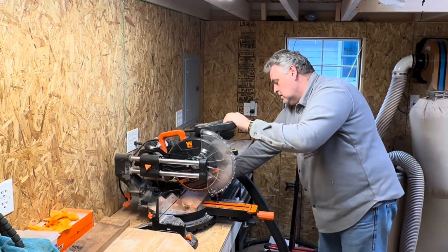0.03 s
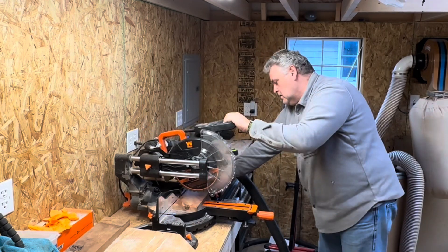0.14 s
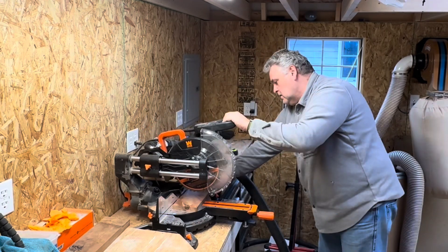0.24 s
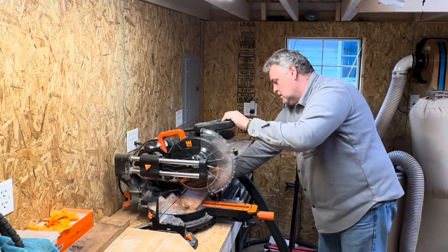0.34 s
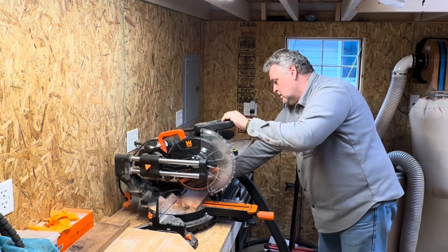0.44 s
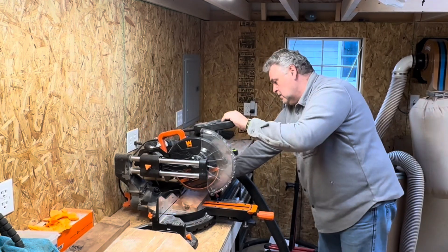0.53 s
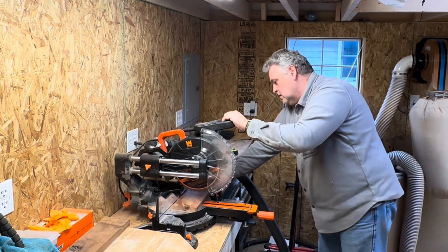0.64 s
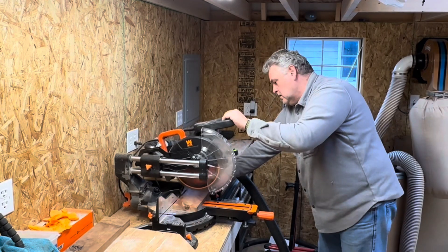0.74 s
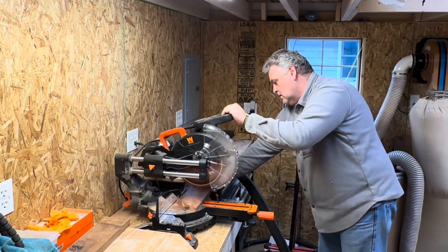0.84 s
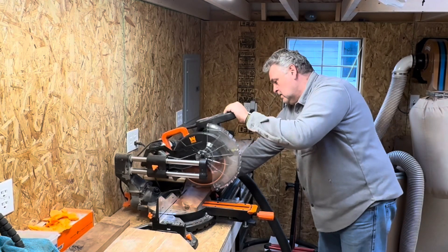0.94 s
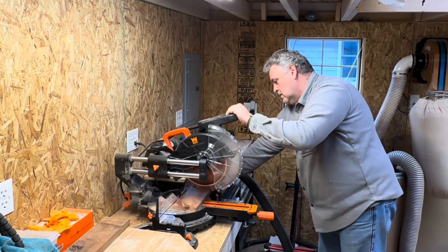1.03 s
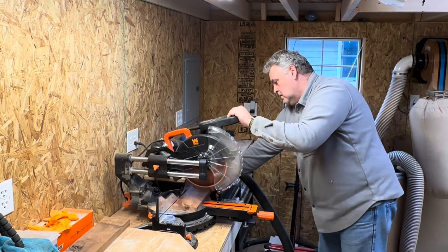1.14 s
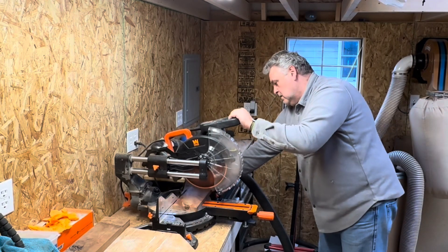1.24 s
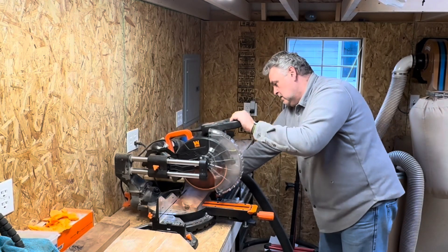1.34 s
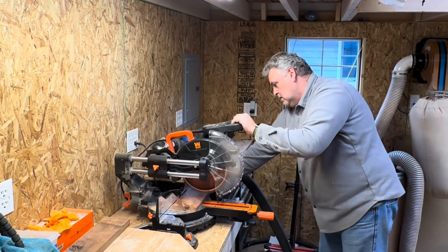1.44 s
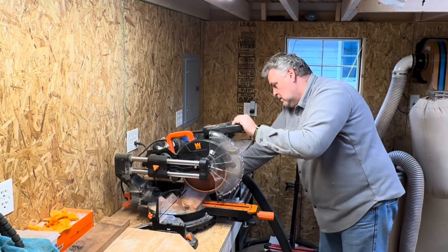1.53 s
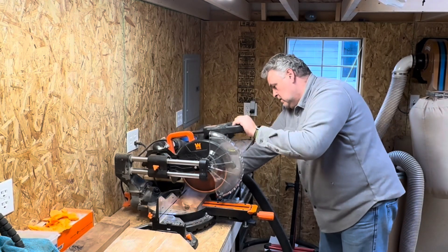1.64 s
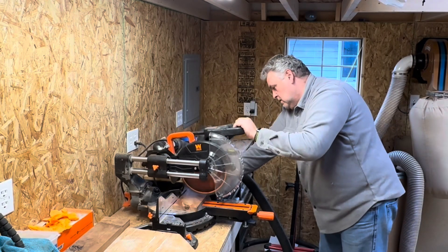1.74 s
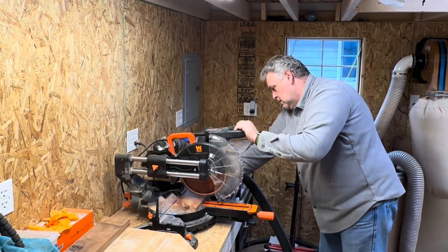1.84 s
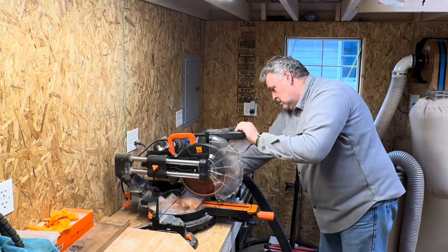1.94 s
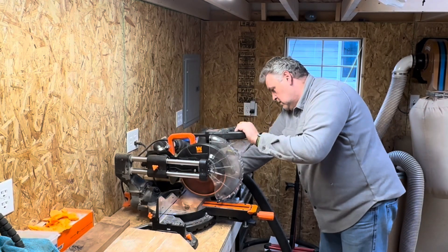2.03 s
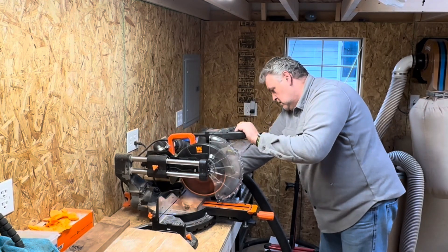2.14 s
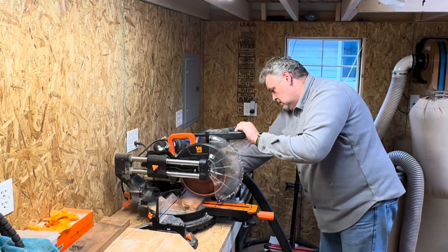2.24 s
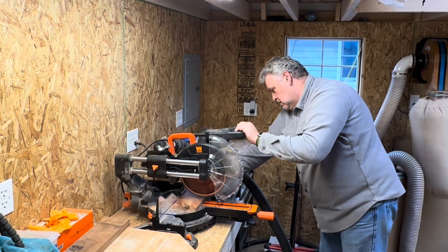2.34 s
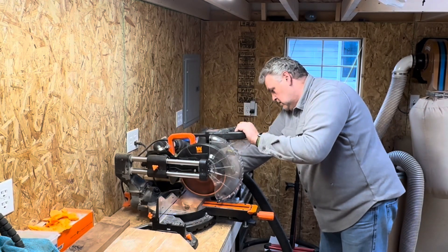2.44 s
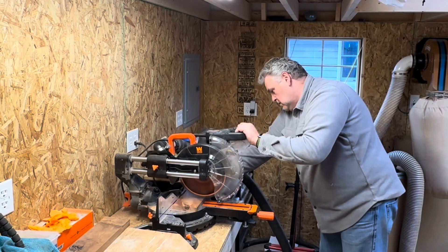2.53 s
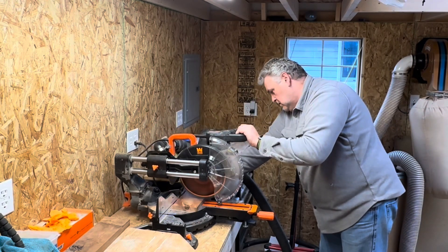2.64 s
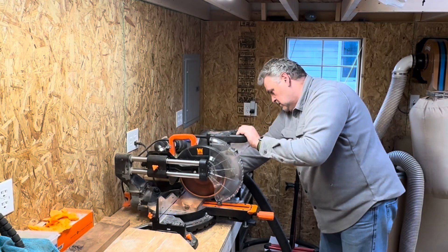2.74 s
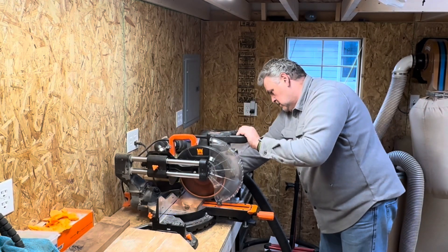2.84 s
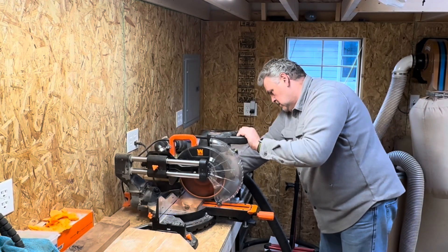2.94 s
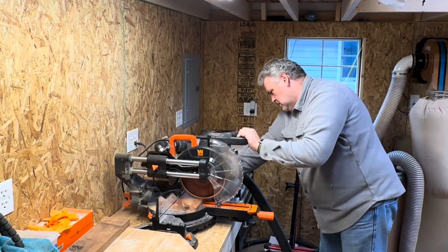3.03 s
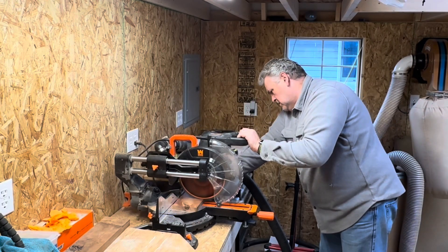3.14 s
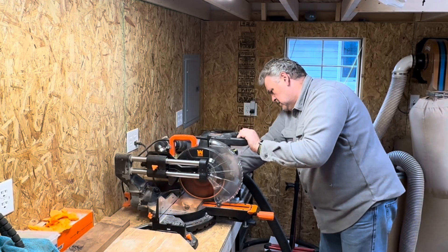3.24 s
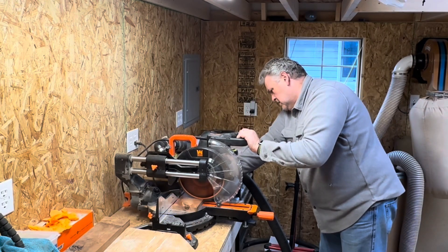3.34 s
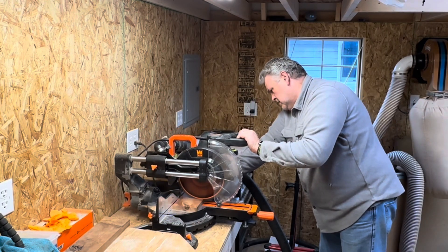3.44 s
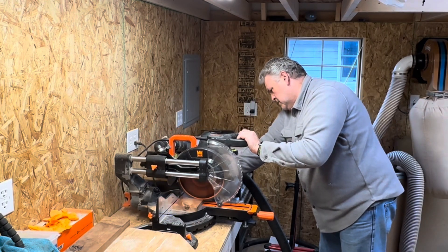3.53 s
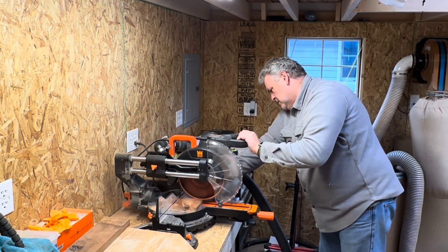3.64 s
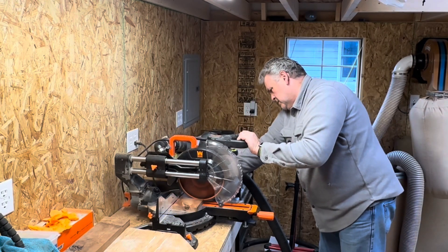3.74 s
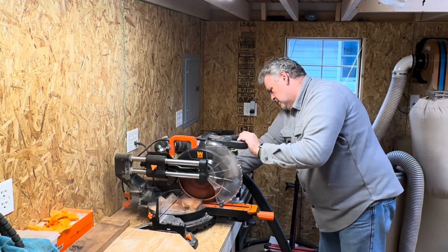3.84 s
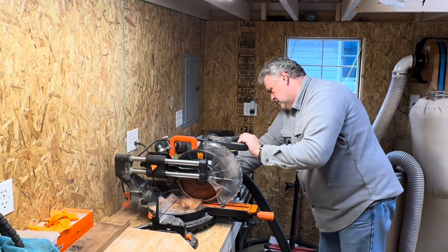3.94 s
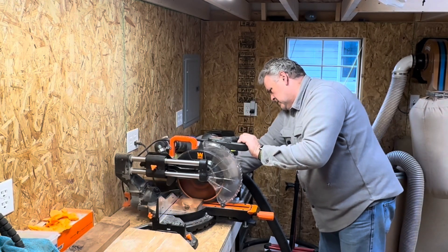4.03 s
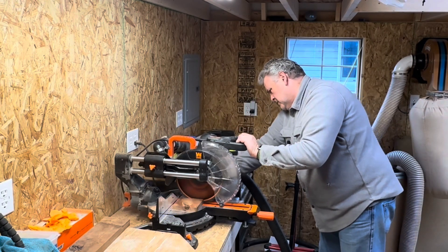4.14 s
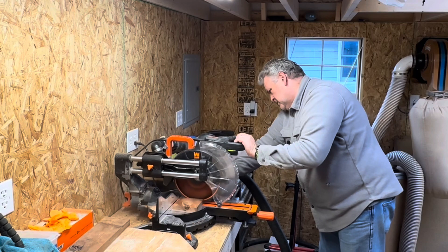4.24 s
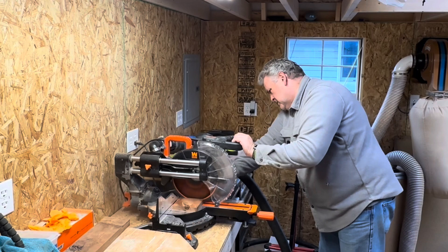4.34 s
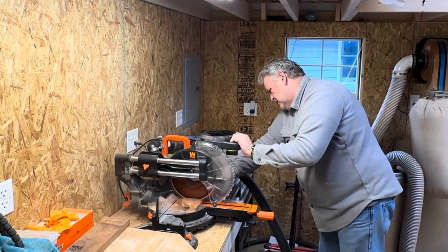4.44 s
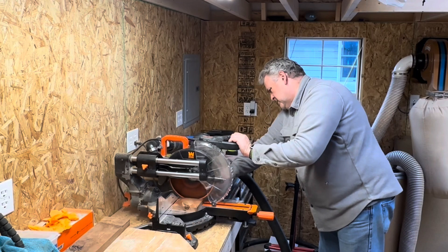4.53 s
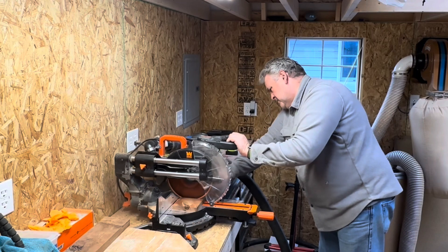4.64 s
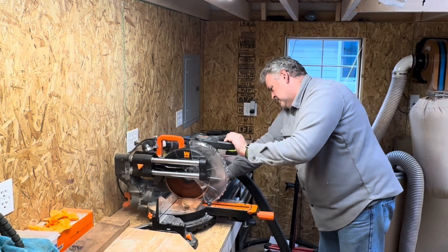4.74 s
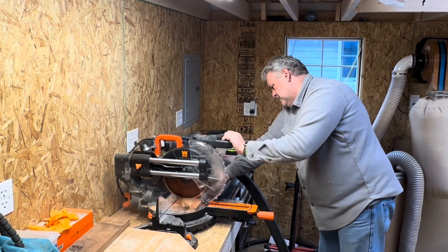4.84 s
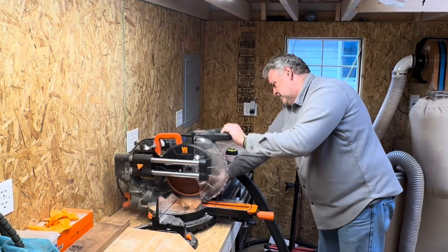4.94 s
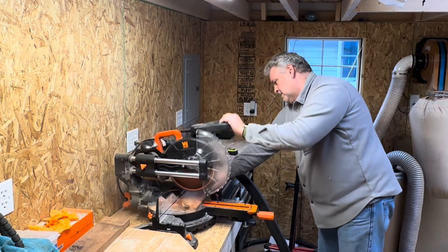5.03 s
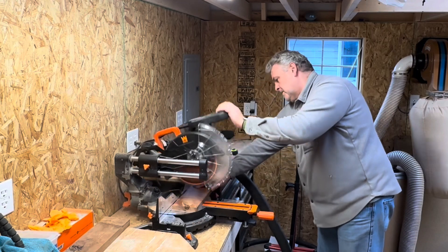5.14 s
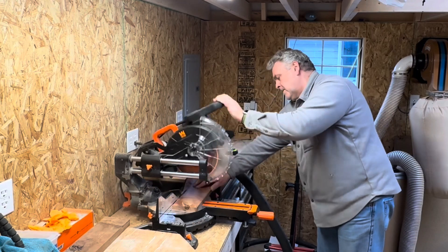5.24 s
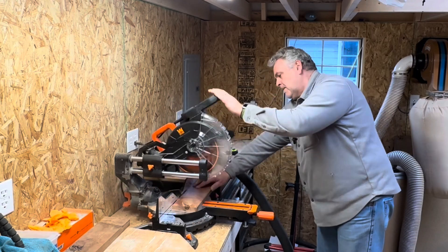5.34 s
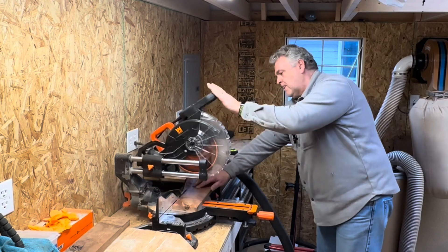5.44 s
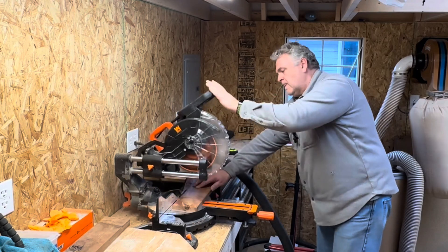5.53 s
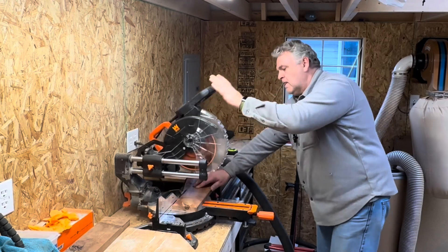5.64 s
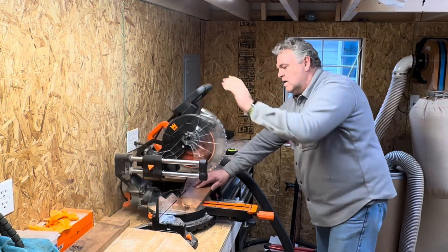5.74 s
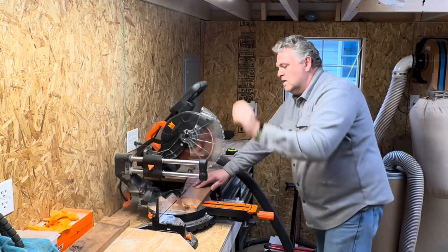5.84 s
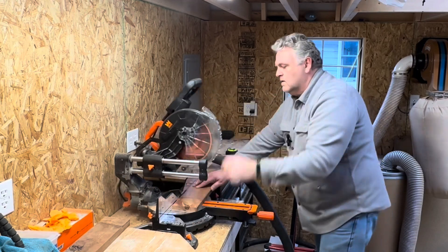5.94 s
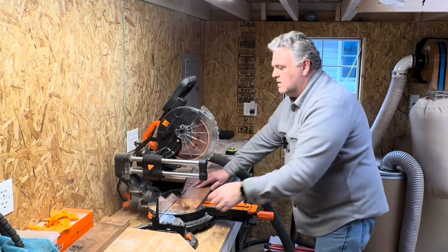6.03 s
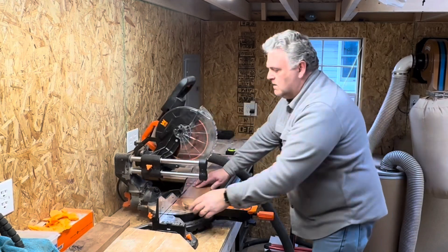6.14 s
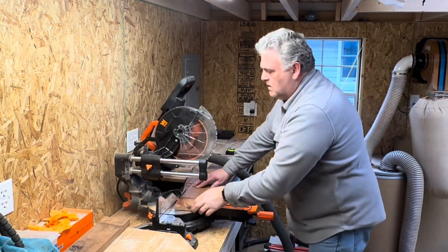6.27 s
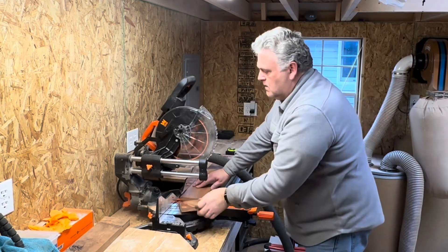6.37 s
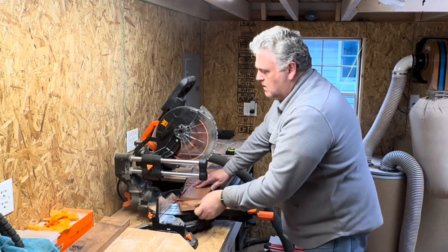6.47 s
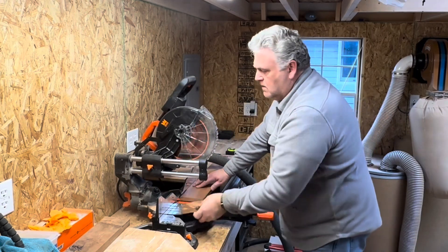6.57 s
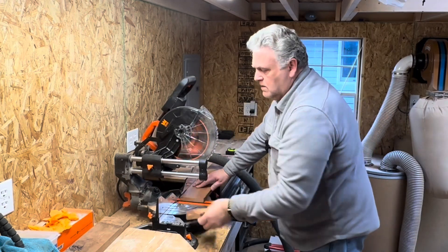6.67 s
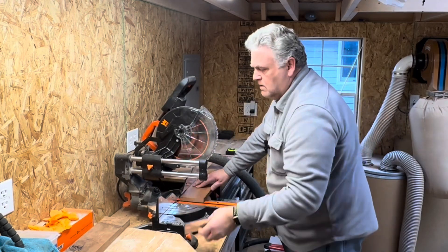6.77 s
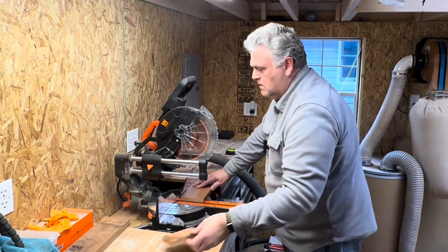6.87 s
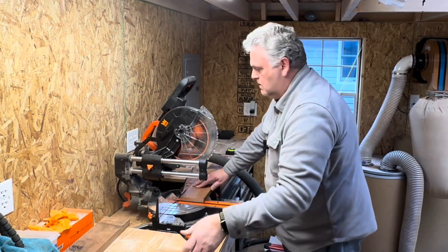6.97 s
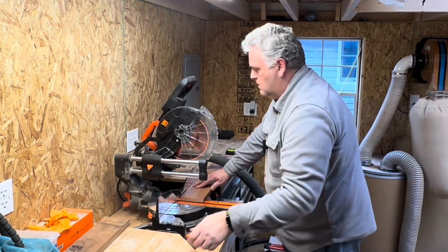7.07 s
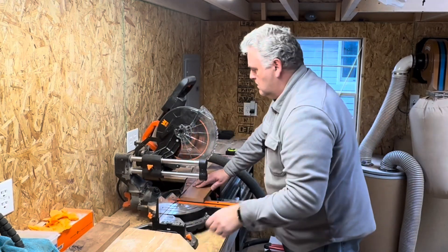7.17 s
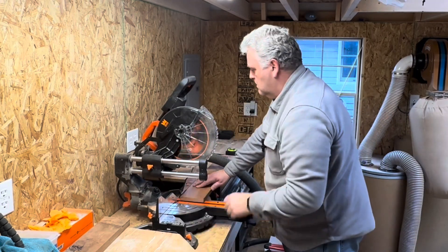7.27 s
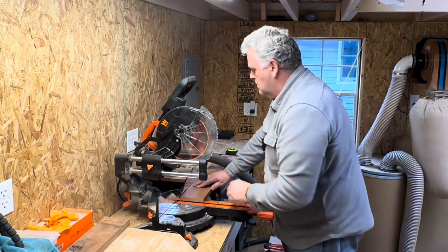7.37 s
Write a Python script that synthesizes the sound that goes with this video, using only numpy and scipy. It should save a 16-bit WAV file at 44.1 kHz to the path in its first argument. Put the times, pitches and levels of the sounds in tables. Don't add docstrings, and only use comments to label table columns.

```python
import sys
import numpy as np
from scipy import signal
from scipy.fft import rfft, irfft
from scipy.io import wavfile
from scipy.ndimage import uniform_filter1d

SR = 44100
rng = np.random.default_rng(int(sys.argv[2]) if len(sys.argv) > 2 else 0)


def file_out(sig):
    cols = np.atleast_2d(sig).T
    lim = np.clip(cols, -1, 1)
    pcm = np.round(lim * 32767).astype(np.int16)
    wavfile.write(sys.argv[1], SR, pcm)


def gain_from_db(level_db):
    decades = np.asarray(level_db, float) / 20
    return 10 ** decades


N = 326428
T = np.arange(N) / SR
HZ = np.fft.rfftfreq(1024, 1 / SR)
FRAME_T = (np.arange(N // 256 + 5) * 256) / SR
BRAKE_S, COAST_S, CRAWL_S = 4.95, 5.32, 5.62
# from and to, in seconds.
SINKING = (2.2, 2.8)
# time in seconds, turns in Hz.
ARMATURE = [(.76, 135.8), (.85, 199.4), (.95, 248.7), (1.1, 294.2), (1.3, 325.3), (1.5, 344.5),
            (1.9, 367.5), (2.62, 385.5), (3.04, 372.6), (3.7, 361), (4.4, 348), (4.9, 359.5), (4.97, 345),
            (5.13, 256), (5.3, 187), (5.5, 127.1), (5.72, 96.4), (6.2, 56)]
# time in seconds, whine in dB, roar in dB, dullness of the roar in dB.
WORK = [(.7, -10, -43, 7), (.78, -9.5, -28, 0), (.92, -9, -20, 1), (1.25, -8.5, -14, -4.5),
        (1.94, -11, -13, -6.5), (2.38, -14.5, -15.5, -19), (2.6, -18.5, -21.5, -18.5),
        (2.86, -27.5, -30, -12), (3.46, -34.5, -34.5, -6), (3.62, -47, -34.5, -6),
        (4.83, -53, -30.5, -13.5), (5.0, -35, -36, -5), (5.12, -19.5, -39.5, 4), (5.27, -23, -43.5, 5.5),
        (5.5, -26, -48, 5), (5.72, -33, -55.5, 7), (6.1, -50, -54, -0.5), (6.3, -38, -67, 23)]


def evened(x):
    return x / np.sqrt(np.mean(x ** 2) + 1e-20)


def read(points):
    f, value = np.transpose(points)
    return np.interp(np.log(HZ + 1), np.log(f + 1), value)


def columns(rows, t):
    s, *values = np.transpose(rows)
    return [np.interp(t, s, v) for v in values]


def stretch(start, end, ramp, outside_db, inside_db):
    corners = [start - ramp, start + ramp, end - ramp, end + ramp]
    return np.interp(T, corners, [outside_db, inside_db, inside_db, outside_db])


def humps(modes, lift_db):
    power = 1
    for hz, width, db in modes:
        power = power + gain_from_db(2 * (db + lift_db)) / (1 + (2 * (HZ - hz) / width) ** 2)
    return np.sqrt(power)


def resonate(x, hz, width):
    turn = np.exp(2j * np.pi * np.cumsum(hz * np.ones(len(x))) / SR)
    r = np.exp(-np.pi * width / SR)
    return 2 * (turn * signal.lfilter([1 - r], [1, -r], x / turn)).real


def drift(span):
    size = round(span * SR)
    return evened(uniform_filter1d(uniform_filter1d(rng.standard_normal(N), size), size))


def noise(gain, patchy_db):
    a, b, patches = rng.standard_normal((len(FRAME_T), len(HZ), 3)).T
    patches = uniform_filter1d(uniform_filter1d(patches, size=6, axis=0), size=12, axis=1)
    grains = a + 1j * b
    unit = np.sqrt(np.mean(signal.istft(grains[:, :200], nperseg=1024, noverlap=768)[1] ** 2))
    shaped = grains * gain * gain_from_db(patchy_db * evened(patches))
    return signal.istft(shaped, nperseg=1024, noverlap=768)[1][:N] / unit


def band_unit(gain, lo_hz, hi_hz):
    inside = (HZ > lo_hz) & (HZ < hi_hz)
    return gain / np.sqrt((gain[inside] ** 2).sum(0) / len(HZ))


def bursts(rows):
    out = np.zeros(N)
    for s, length, hz, width, db in rows:
        shake = rng.standard_normal(round(length * SR) + 4000)
        sing = evened(resonate(resonate(shake, hz, width), hz, width)[4000:])
        out[round(s * SR):][:len(sing)] += gain_from_db(db) * sing * signal.windows.tukey(len(sing), .5)
    return out


def room(x, wet_db, t60):
    tail = rng.standard_normal(12000) * gain_from_db(-60 * T[:12000] / t60)
    return x + gain_from_db(wet_db) * signal.fftconvolve(x, tail / np.linalg.norm(tail))[:N]


def extractor():
    # time in seconds, blade tone in dB, hose whistle in Hz.
    fan = [(0, -50.5, 3220), (.27, -52, 2980), (.4, -52, 3200), (.47, -50, 3300), (.68, -53.5, 3100),
           (5.4, -56, 3500), (5.5, -50.5, 3040), (5.906, -30.5, 3190), (6.634, -26, 3185),
           (7.132, -29, 3070), (7.16, -25, 3220), (7.22, -32, 2920), (7.3, -34.5, 2920), (7.4, -36, 2920)]
    # frequency in Hz, level in dB per Hz.
    air_colour = [(15, -77), (25, -49), (140, -33), (297, -18.5), (331, -6.5), (359, -28), (410, -11),
                  (666, -15.5), (826, -13.5), (896, -15), (1020, -19.5), (2300, -32.5), (3260, -37),
                  (4270, -37), (15500, -50)]
    # frequency in Hz, width in Hz, level in dB.
    duct = [(195, 17, 11.5), (280, 8.9, 12.5), (603, 14, 0.5), (842.5, 16, 11), (1070.7, 8.2, 15),
            (1200, 38, -2), (4070, 30, 8), (4930, 60, 8)]
    quiet_db = -52
    tone_db, whistle_hz = columns(fan, T)
    turns = np.cumsum(356.4 + 1.52 * drift(0.029)) / SR
    tone = np.zeros(N)
    for k, db in zip([1, 2, 3], [3, -27, -24]):
        tone += gain_from_db(tone_db + db + 0.69 * drift(0.015)) * np.sin(2 * np.pi * k * turns)

    swell_db = np.interp(FRAME_T, T, tone_db) - quiet_db
    rush_db = -46 + 0.15 * swell_db
    bright_db = -1 - 0.39 * swell_db
    shape = band_unit(gain_from_db(read(air_colour)) * humps(duct, 0), 400, 1300)
    treble = np.interp(HZ, [3300, 4000, 7500, 9000], [0.044, 1.0, 0.42, 0.041])
    rush = noise(shape[:, None] * gain_from_db(rush_db + 0.96 + np.outer(treble, bright_db + 12)), 2.2)

    whistle_db = -57 + .3 * (tone_db - quiet_db) - .034 * (whistle_hz - 3150)
    breath = resonate(rng.standard_normal(N), whistle_hz, 450)
    whistle = evened(resonate(breath, whistle_hz, 450))
    return tone + rush + gain_from_db(whistle_db + 2.5 + 2 * drift(0.06)) * whistle


def microphone():
    mains_hz, mains_db, hiss_db = 60, -67, -60
    hiss = signal.lfilter(*signal.butter(2, 13000, "high", fs=SR), rng.standard_normal(N))
    return gain_from_db(mains_db) * np.sin(2 * np.pi * mains_hz * T) + gain_from_db(hiss_db) * evened(hiss)


def gusts():
    # start in seconds, length in seconds, frequency in Hz, width in Hz, level in dB.
    caught = [(.16, .13, 1530, 60, -57), (0, .42, 4250, 250, -59), (0, .42, 3350, 250, -58),
              (.15, .18, 2930, 80, -51), (.24, .16, 3030, 250, -52), (.42, .13, 480, 25, -48),
              (5.85, .2, 1070, 25, -46), (5.85, 1.15, 275, 14, -47), (6.14, .14, 850, 20, -46),
              (6.0, .16, 3300, 300, -48)]
    return bursts(caught)


def roar():
    # frequency in Hz, level in dB per Hz.
    roar_colour = [(15, -51), (25, -21.5), (101, -16.5), (253, -25.5), (369, -48.5), (445, -10),
                   (567, -18.5), (872, -12), (1020, -15.5), (1950, -4.5), (3350, -2.5), (4270, 1.5),
                   (9820, -6), (13900, -1.5), (15500, -5)]
    # frequency in Hz, width in Hz, level in dB.
    free_modes = [(444.4, 28, 1.5), (900, 20, -4.5), (1270, 160, -1.5), (2190, 370, 7), (2596, 33, 11),
                  (2920, 150, 6.5), (3840, 1130, 3.5), (6200, 570, -4.5), (8130, 830, -4.5),
                  (13740, 980, -11)]
    # frequency in Hz, width in Hz, level in dB.
    held_modes = [(493, 660, 13.5), (1944, 16, 8.5), (2450, 41, 6), (2920, 17, -22.5), (4247, 11, 11),
                  (4740, 27, 8), (5370, 24, -41), (6020, 24, 9.5), (6600, 71, -12), (6730, 660, 3.5),
                  (8430, 470, 2.5)]
    bands = [(9300, 15500), (550, 1300), (2750, 3600), (4900, 6100)]
    _, level_db, dull_db = columns(WORK, FRAME_T)
    sunk = np.interp(FRAME_T, SINKING, [0, 1])

    bite_s = 2.64
    bite_times = [SINKING[0] - .2, SINKING[0], bite_s - .02, bite_s + .03, SINKING[1] + .1]
    bite_db = np.interp(FRAME_T, bite_times, [0, 4, 4, -5, 0])
    tilts_db = [0, dull_db, 0.36 + 0.64 * dull_db, 1.3 + 0.56 * dull_db + bite_db]

    modes = np.outer(humps(free_modes, 13.3), 1 - sunk) + np.outer(humps(held_modes, 2.0), sunk)
    shape = gain_from_db(read(roar_colour))[:, None] * modes
    own_db = [20 * np.log10(shape[9] / band_unit(shape, *band)[9]) for band in bands]
    want_db = np.array([level_db + tilt - own for tilt, own in zip(tilts_db, own_db)])

    knots_hz = np.log([200, 850, 2200, 3100, 5500, 11000])
    throat_db = 2.2 * (1 - sunk)
    lift_db = []
    for (hiss, body, rasp, fizz), throat in zip(want_db.T, throat_db):
        knots_db = [0.5 * hiss + 0.53 * body, body, min(rasp, fizz + 4) + throat, rasp - throat, fizz, hiss]
        lift_db.append(np.interp(np.log(HZ + 1), knots_hz, knots_db))

    fade = np.interp(FRAME_T, [WORK[-1][0] - .2, WORK[-1][0] + 0.64], [1, 0])
    start = np.interp(T, [.678, .693, .7], [0, .14, 1])
    return start * noise(shape * gain_from_db(np.transpose(lift_db) - 1.5) * fade, 2.06)


def trigger():
    # start in seconds, length in seconds, frequency in Hz, width in Hz, level in dB.
    clicks = [
        (.6815, .004, 14400, 1800, -29),
        (.684, .014, 14400, 1800, -43),
    ]
    return bursts(clicks)


def jolt():
    # start in seconds, length in seconds, frequency in Hz, width in Hz, level in dB.
    shakes = [(.684, .012, 810, 200, -35), (.695, .014, 810, 15, -13), (.708, .021, 815, 15, -9),
              (.737, .032, 770, 20, -15), (.767, .012, 770, 20, -21), (.783, .01, 760, 20, -17),
              (.695, .06, 650, 600, -23), (.695, .05, 2200, 250, -30), (.778, .045, 2000, 200, -15),
              (.83, .12, 4350, 400, -14.5), (.75, .1, 125, 25, -36), (1.0, .1, 5750, 200, -22),
              (.86, .07, 7500, 150, -24)]
    return bursts(shakes)


def speed():
    s, hz = np.transpose(ARMATURE)
    return uniform_filter1d(np.exp(np.interp(T, s, np.log(hz) ** 3) ** (1 / 3)), size=2500)


def flutter():
    turns = np.cumsum(speed()) / SR
    tick = np.exp(1.2 * np.cos(2 * np.pi * turns + .2 * drift(.01)))
    depth = np.interp(T, [5.45, 5.6, 5.95, 6.15], [.15, .55, .62, .25])
    return 1 + depth * (evened(tick) - 1)


def casing(hz, modes):
    power = gain_from_db(2 * -38)
    for f, width, db in modes:
        power = power + gain_from_db(2 * db) / (1 + (2 * (hz - f) / width) ** 2) ** 2
    return 10 * np.log10(power)


def order_levels(hz):
    multiples = [2, 7, 12, 14, 19, 24]
    # level in dB running free, cutting, braking, coasting, crawling.
    strength = [(-17.5, -0.5, -8, -27, -40), (0, -33, -10.5, -25, -24), (-4, 3, 0, -29, -35),
                (-3, -13, 0.5, -3, -37), (-13, -18.5, 9, -28, -37), (-11.5, -4, -21, -31, 4.5)]
    # frequency in Hz, width in Hz, level in dB.
    driven_modes = [(441, 210, -1.5), (696, 57, -1), (1544, 120, -13), (1680, 335, 0), (2160, 215, -2),
                    (2920, 380, -5.5), (4070, 380, -12), (4340, 82, -8.5), (4437, 410, -1),
                    (5000, 1300, -1.5), (6400, 790, 4.5), (6820, 370, 7), (8100, 1100, 4), (8090, 360, -10)]
    # frequency in Hz, width in Hz, level in dB.
    braked_modes = [(560, 270, -0.5), (1770, 150, 4), (2140, 110, -10.5), (3225, 480, 0), (4290, 750, -9.5)]
    # multiple, level in dB against the roar.
    faint = [(3, -22), (6, -19), (21, -15)]
    # multiple, start in seconds, end in seconds.
    coasting = [(7, 4.93, 5.04), (7, 5.22, 5.35), (13, 5.1, 5.24), (21, 5.18, 5.3), (19, 5.3, 5.45),
                (45, 5.64, 5.87), (106, 5.5, 5.7), (114, 5.96, 6.15)]
    coasting_db = [-30, -36, -33, -35, -46, -49, -57, -59]
    # multiple, start in seconds, end in seconds.
    swells = [(7, 1.0, 1.12), (7, 1.13, 1.38), (7, 1.45, 2.25), (12, 1.62, 2.12), (12, 2.88, 3.38),
              (14, 1.05, 1.16), (14, 1.19, 2.65), (24, .95, 1.3), (24, 1.68, 1.86), (24, 1.9, 2.25),
              (19, 1.25, 2.2), (2, 2.2, 2.85), (3, 1.84, 2.02), (3, 2.2, 2.36), (3, 2.4, 2.8),
              (3, 2.85, 3.55), (6, 1.5, 2.0), (19, 5.0, 5.16), (14, 5.13, 5.58), (12, 5.19, 5.3),
              (24, 5.62, 5.8), (24, 5.98, 6.1), (12, 1.22, 1.5), (14, 5.44, 5.57), (12, 2.18, 2.55),
              (12, .7, .85), (14, .7, .85)]
    swells_db = [-3, 4.5, -5, -7, -4, 2, -7, -6, 4, -6, -5, -9, 5, 4, -9, 6, 4, -11, 1.5, -6, -6, -5, 3, 3,
                 3, -6, -6]
    whine_db, roar_db, _ = columns(WORK, T)
    states = [*SINKING]
    for s in (BRAKE_S, COAST_S, CRAWL_S):
        states += [s - .05, s + .05]

    lines = []
    slow_t, slow_hz = T[::64], hz[::64]
    for k, (free, cut, brake, coast, crawl) in zip(multiples, strength):
        state_db = np.interp(T, states, [free, cut, cut, brake, brake, coast, coast, crawl])
        driven, braked = casing(k * slow_hz, driven_modes), casing(k * slow_hz, braked_modes)
        casing_db = np.interp(T, slow_t, np.where(slow_t < BRAKE_S, driven, braked))
        lines.append([k, whine_db + state_db + casing_db])
    for k, db in faint:
        lines.append([k, roar_db + db])
    for (k, start, end), db in zip(coasting, coasting_db):
        lines.append([k, db + stretch(start, end, .05, -30, 0)])

    for (order, start, end), swell_db in zip(swells, swells_db):
        for line in lines:
            if line[0] == order:
                line[1] = line[1] + stretch(start, end, .03, 0, swell_db)
    return lines


def whine():
    rough = {2: 1.2, 7: .55, 12: .95, 13: 2, 14: 1.6, 19: 1.6, 21: 2, 24: .45, 45: 9, 106: 2, 114: 7}
    hz = speed()
    turns = np.cumsum(hz) / SR
    blade_turn = 0.21
    wobble = np.interp(T, [2.5, 2.7, 4.9, 5.0], [.2, .45, .6, .5]) * np.cos(2 * np.pi * blade_turn * turns)
    play = np.interp(T, [2.0, 2.3, 3.5, 4.95, 5.1, 5.25, 5.35], [.33, .22, .25, .33, .52, .52, .14])
    rattle = drift(.003) + 1j * drift(.003)
    sway, sway_db = drift(.03), np.where(T < COAST_S, 1.2, .8)
    tone, ticks = np.zeros(N), flutter()
    for place, (k, db) in enumerate(order_levels(hz)):
        lag = 9000 * place
        shaken = 1 + wobble + rough.get(k, 1.5) * play * np.roll(rattle, lag)
        level = gain_from_db(db + sway_db * np.roll(sway, lag))
        if k > 40:
            level = level * ticks
        tone += level * (shaken * np.exp(2j * np.pi * k * turns)).real
    turning = (T > ARMATURE[0][0]) * (T < ARMATURE[-1][0])
    return tone * uniform_filter1d(1. * turning, size=900)


def panels():
    # start in seconds, length in seconds, frequency in Hz, width in Hz, level in dB.
    drumming = [(1.14, .14, 120, 30, -38), (1.27, .24, 850, 50, -29), (1.53, .2, 470, 70, -32),
                (1.98, .22, 455, 60, -33), (2.04, .24, 1600, 300, -31), (1.2, .12, 1920, 50, -27)]
    return bursts(drumming)


def binds():
    # start in seconds, length in seconds, frequency in Hz, level in dB.
    pinches = [(2.2, 1.12, 2620, -33), (2.78, .12, 7400, -36), (2.8, .1, 5300, -34), (3.62, .17, 6800, -37),
               (3.97, .17, 480, -35), (3.97, .1, 5000, -36), (3.98, .07, 5500, -39), (3.98, .07, 5950, -40),
               (4.0, .12, 7000, -36), (4.17, .14, 2500, -36), (4.3, .3, 8450, -40), (4.38, .2, 6340, -36),
               (4.6, .1, 6720, -38), (4.82, .1, 6730, -30), (4.82, .1, 6360, -35), (4.84, .07, 5000, -38),
               (5.28, .26, 4480, -41), (5.44, .3, 6680, -49), (5.5, .22, 5750, -49)]
    return bursts([(s, length, hz, 55 + .018 * hz, db) for s, length, hz, db in pinches])


def guard():
    # start in seconds, length in seconds, frequency in Hz, width in Hz, level in dB.
    narrow_rings = [(2.81, .13, 4370, 20, -28), (3.35, .11, 4370, 60, -30), (5.56, .1, 4450, 300, -42),
                    (5.64, .14, 4600, 450, -43), (5.74, .28, 4700, 450, -50), (5.92, .26, 14300, 1200, -54),
                    (5.98, .19, 12300, 500, -58), (6.04, .13, 13800, 70, -59), (3.04, .34, 4365, 25, -36),
                    (4.2, .65, 2475, 30, -42), (4.38, .11, 5050, 40, -39)]
    return bursts(narrow_rings)


def board():
    # time in seconds, peak in dB, brightness in dB,
    # pitch in Hz favoured by the spot that lands.
    knocks = [(6.985, -24, -30, 950), (7.008, -5.5, -6.5, 1200), (7.015, -10.5, -3, 1310),
              (7.021, 3, -13, 1380), (7.028, -2, -12, 1250), (7.034, -3, -10.5, 1280),
              (7.041, -3.5, -11.5, 1050), (7.053, -20, -14, 1000), (7.062, -8, -19, 950),
              (7.076, -12, -28, 950), (7.088, -13, -35, 900), (7.128, -6, -32.5, 1270),
              (7.135, -6, -37, 1300), (7.144, -7.5, -42, 1300), (7.156, -11.5, -30, 1000)]
    # frequency in Hz, width in Hz, level in dB.
    wood_modes = [(70, 60, -24), (253, 76, -15.5), (436, 67, 7.5), (674, 91, -15), (810, 110, -0.5),
                  (1005, 88, 3), (1200, 104, 0), (1377, 110, -2), (1507, 130, -3.5), (1616, 110, -3.5),
                  (1857, 97, -8.5), (2040, 90, -21)]
    # frequency in Hz, width in Hz, level in dB.
    metal_modes = [(3000, 920, 15.5), (3300, 180, -5), (4586, 150, 9), (4400, 1800, 5), (6150, 2800, -9),
                   (9340, 880, -30)]
    out, t = np.zeros(N), T[:4000]
    for s, db, bright_db, spot_hz in knocks:
        scrape = rng.standard_normal(4000) * np.exp(-t / .003) * np.minimum(t / .0015, 1)
        blow = (t < 1 / SR) * 2 + .4 * scrape
        thud, crack = np.zeros(4000), np.zeros(4000)
        for k, (hz, w, d) in enumerate(wood_modes):
            spot_db = -9 * min(np.log2(hz / spot_hz) ** 2, 1)
            ring = resonate(resonate(resonate(blow, hz, w), hz, 5 * w), hz, 9 * w)
            thud += (-1) ** k * gain_from_db(d + spot_db) * ring / w
        for hz, w, d in metal_modes:
            ring = resonate(resonate(resonate(scrape, hz, w), hz, 3 * w), hz, 4 * w)
            crack += gain_from_db(d) * ring / np.sqrt(w)
        knock = thud / abs(thud).max() + gain_from_db(bright_db) * crack / abs(crack).max()
        out[round(s * SR):][:4000] += gain_from_db(db - 3.0) * knock
    return out


def scene():
    rush = roar() + trigger() + jolt() + panels() + binds() + guard() + gusts()
    shaken = signal.filtfilt(*signal.butter(4, 7500, fs=SR), rush)
    saw = room(whine(), -9, .2) + rush + (flutter() - 1) * shaken
    return np.tile(saw + extractor() + room(board(), -2, 0.19) + microphone(), (2, 1))


def split(mono):
    # time in seconds, lowest and highest frequency in Hz.
    parted = [(1.486, 9560, 11110), (1.486, 13740, 15250), (1.625, 7490, 9040), (1.811, 4570, 5770),
              (1.811, 10250, 12470), (1.858, 6200, 7580), (1.858, 10940, 13090), (3.46, 11000, 12490),
              (3.994, 6850, 8310), (4.11, 4150, 5250), (4.11, 10920, 12420), (4.11, 13090, 14560),
              (4.83, 12300, 13850), (4.876, 14300, 15600)]
    side, size = np.zeros(N), 2048
    hz = np.fft.rfftfreq(size, 1 / SR)
    for s, lo_hz, hi_hz in parted:
        at = round(s * SR) - size // 2
        band = rfft(mono[at:at + size]) * (hz > lo_hz) * (hz < hi_hz)
        scattered = irfft(abs(band) * np.exp(2j * np.pi * rng.random(len(hz))))
        side[at:at + size] += scattered * np.hanning(size) / np.sqrt(2)
    return np.array([mono + side, mono - side])


def low_pass(x):
    return signal.sosfilt(signal.butter(12, 15670, fs=SR, output="sos"), x)


def record(dry):
    ceiling = .92
    limited = ceiling * dry[0] / (ceiling ** 4 + dry[0] ** 4) ** 0.19
    return low_pass(split(limited))


dry = scene()
out = record(dry)
file_out(out)
```